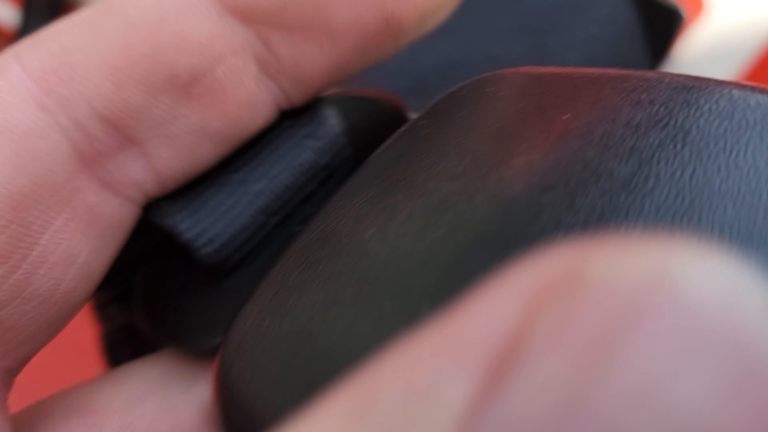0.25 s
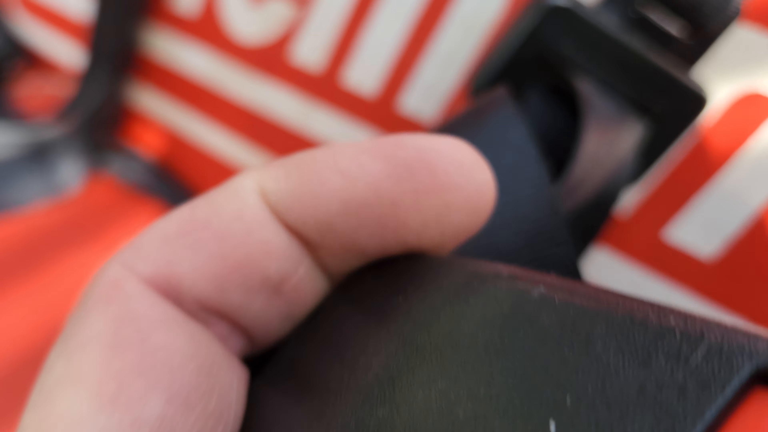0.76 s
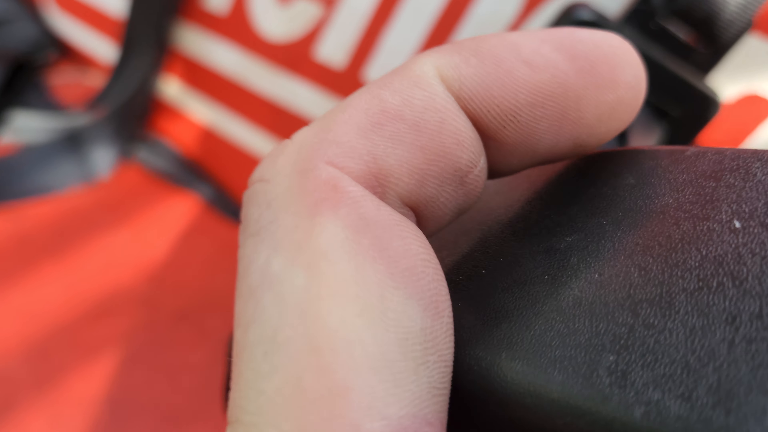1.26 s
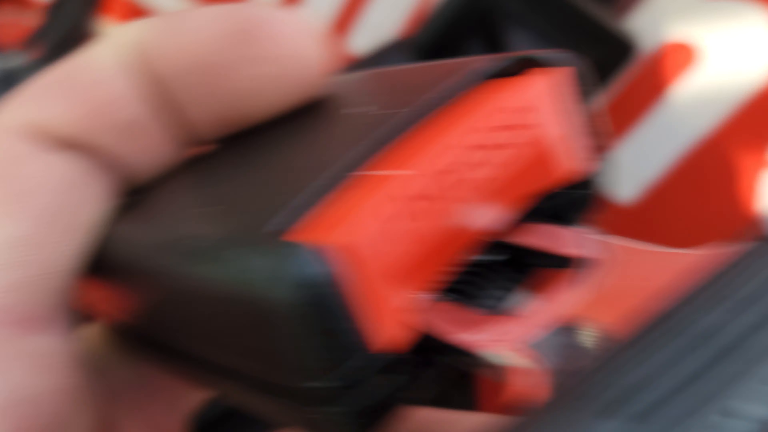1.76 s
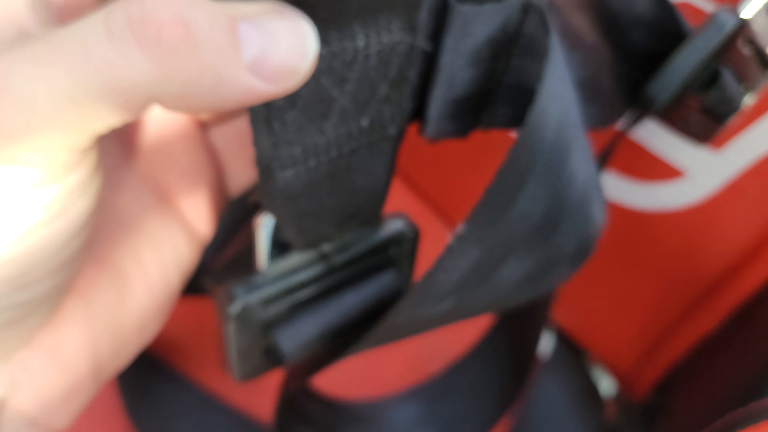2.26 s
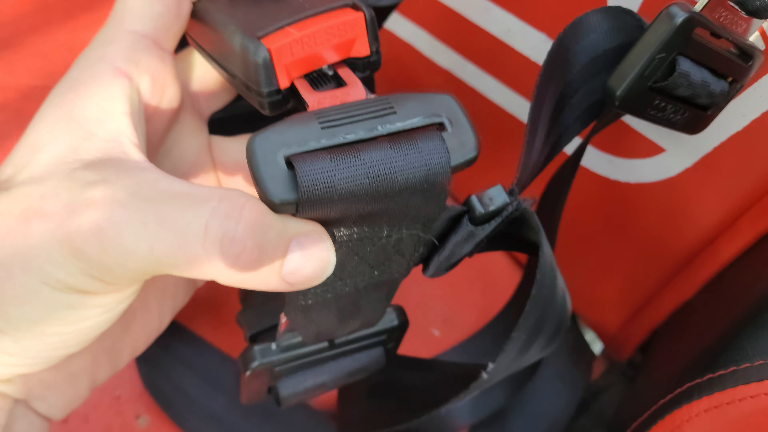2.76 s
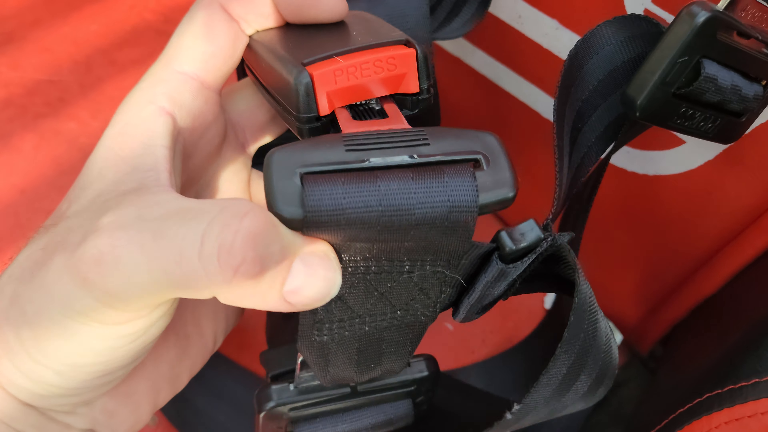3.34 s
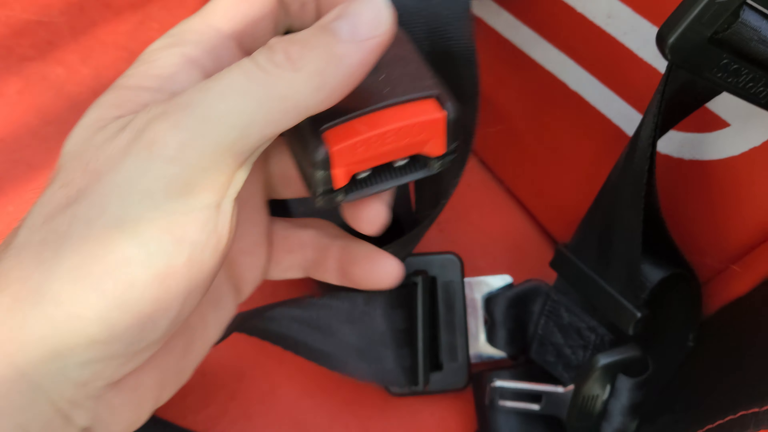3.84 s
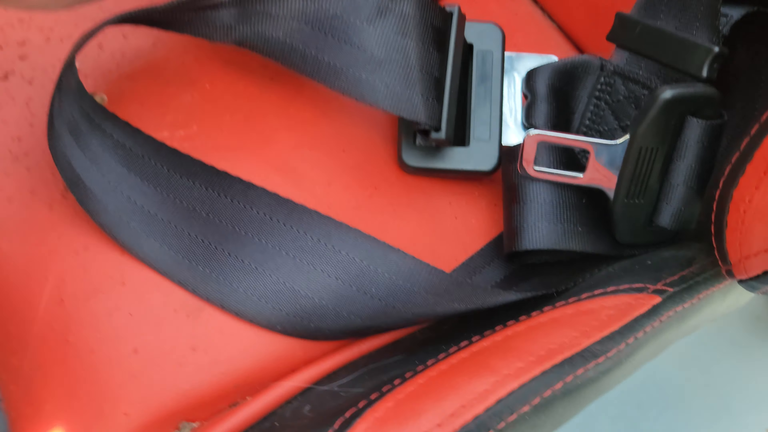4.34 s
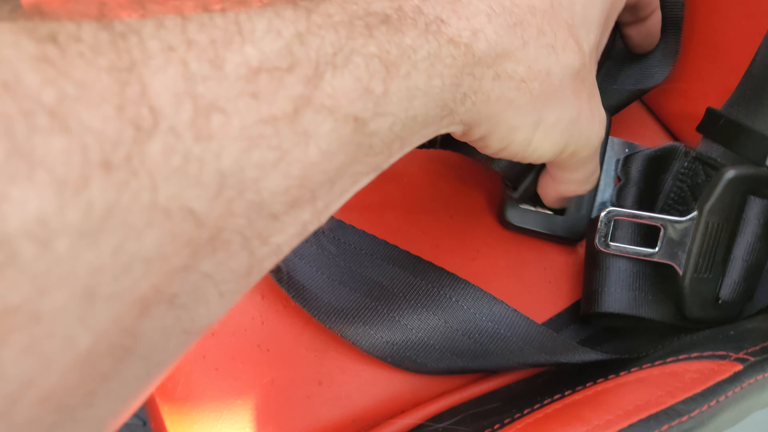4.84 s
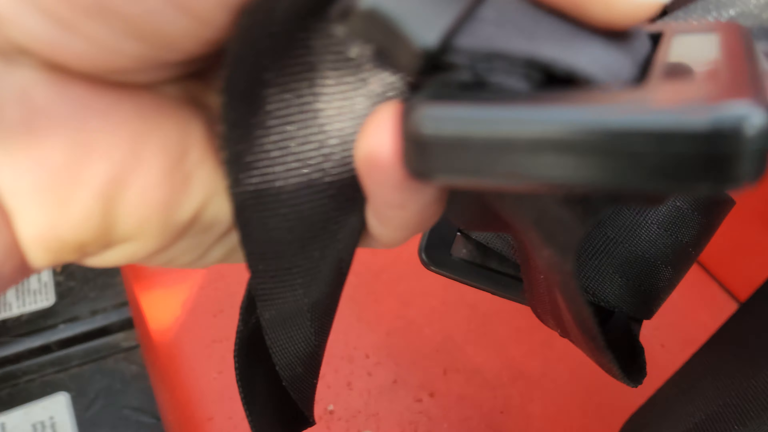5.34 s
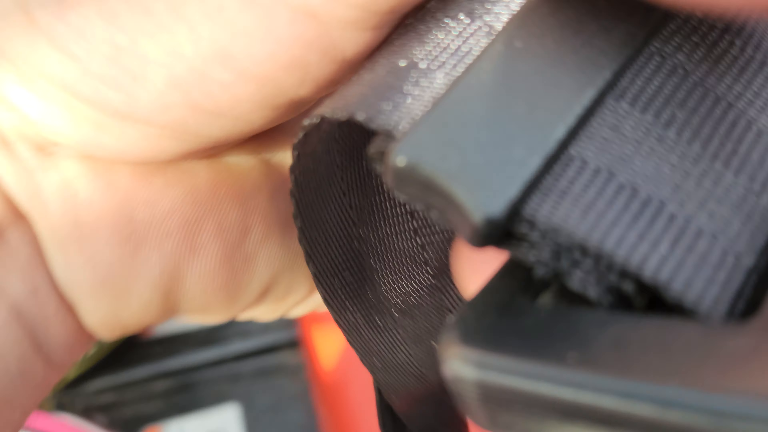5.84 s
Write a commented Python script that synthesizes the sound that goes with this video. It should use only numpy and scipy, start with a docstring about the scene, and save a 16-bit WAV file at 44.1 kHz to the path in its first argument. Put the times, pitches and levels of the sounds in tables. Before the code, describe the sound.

A close, stereo, nearly dry sound of a seatbelt buckle handled outdoors, over a constant soft low rumble and faint hiss. From 0.1 to 0.9 s fingers rub and grip the plastic, with small dull knocks and hollow clacks, clearest near 0.5. A short swish and clack come at 1.03, then a sharper hollow double clack at 1.4. Light knocks at 1.8 and 2.0 lead into a quiet stretch of faint rubbing. Around 2.9 handling resumes, with a barely audible thin whistling squeak at 3.1 to 3.3. At 3.4 to 3.75 the plate comes free in metallic clicks, a soft bump and brisk swishes. Smaller knocks follow at 3.9 and 4.35. At 4.65 to 4.7 comes by far the loudest event, a hard bright plastic-and-steel clack with a short ring and faint echo. Webbing rubs, ticks and small clicks continue, gathering again at 5.8 to 6.0.

```python
"""A low outdoor haze, then almost at once clacks and rubs: a hand turns a seatbelt buckle close by,
frees the latch plate and picks the belt up again. Filtered noise makes the haze.
Damped sines with noise cracks make the hollow plastic clacks; noise chatter through narrow modes, the steel.
Sparse random slips make fingers and webbing rub; damped low sines bump; the surroundings echo faintly."""
import sys
import numpy as np
from scipy import signal
from scipy.fft import rfft, irfft, next_fast_len
from scipy.io import wavfile
from scipy.ndimage import uniform_filter1d

SR = 44100
rng = np.random.default_rng(int(sys.argv[2]) if len(sys.argv) > 2 else 0)


def wav_record(signal):
    """Record a signal, one row per channel, as 16-bit PCM in the file named by sys.argv[1]."""
    frames = np.transpose(np.atleast_2d(signal))
    bounded = np.clip(frames, -1, 1)
    # unit amplitude maps onto the largest positive 16-bit level
    quanta = np.round(bounded * 32767).astype(np.int16)
    wavfile.write(sys.argv[1], SR, quanta)


N = 268436  # samples
EDGE_HZ = 16400  # upper band limit
USUAL_DRAG_DB, USUAL_SMOOTH_DB = -52, -6  # reference drag; reference fizz over swish


def gain_of(db):
    """Amplitude factor of a level in dB."""
    return 10 ** (np.asarray(db) / 20)


def evened(x):
    """Scales to unit rms over all channels."""
    return x / np.sqrt(np.mean(x ** 2) + 1e-20)


def read(points, hz):
    """A table over frequency, joined on a log axis."""
    f, value = np.transpose(points)
    return np.interp(np.log(hz + 1), np.log(f + 1), value)


def add(mix, start_s, sound):
    """Adds a stereo sound in place, cut at the end of the mix."""
    part = mix[:, max(round(start_s * SR), 0):][:, :sound.shape[1]]
    part += sound[:, :part.shape[1]]


def panned(left_right_db):
    """Left and right gains of unit mean power."""
    return evened(gain_of(np.array([[left_right_db], [-left_right_db]]) / 2))


def band(x, edges_hz, order):
    """Butterworth bandpass."""
    edges_hz = np.clip(edges_hz, 10, SR / 2 - 100)
    return signal.sosfilt(signal.butter(order, edges_hz, "band", fs=SR, output="sos"), x)


def levelled(x, db, span_s):
    """Sets the rms level of the first span_s seconds."""
    return x * gain_of(db) / np.sqrt(np.mean(x[:, :int(span_s * SR)] ** 2) + 1e-20)


def decay(t, t60_s):
    """Exponential fall of 60 dB in t60_s."""
    return np.exp(-np.log(1000) * t / t60_s)


def lowpassed(x, order, hz):
    """Lowpass without delay, so that x minus the result is the rest."""
    return signal.sosfiltfilt(signal.butter(order, hz, fs=SR, output="sos"), x)


def drift(points):
    """Slow random curve of unit rms through the given number of points."""
    return evened(signal.resample(rng.standard_normal(points), N))


def resonated(x, hz, width_hz):
    """One narrow resonance with unit peak gain."""
    return signal.lfilter(*signal.iirpeak(hz, hz / width_hz, fs=SR), x)


# likeness of left and right: (frequency [Hz], correlation [-1..1])
LIKENESS = [(60, 1), (130, 0.93), (290, 0.8), (640, 0.37), (1400, 0.006), (2500, 0.071), (15000, -0.037)]


def coloured(x, tone, patchy_db):
    """Gives two noises a spectrum and drifting patches; left and right agree in the bass only."""
    hz, _, z = signal.stft(x, SR, nperseg=2048)
    same = np.clip(read(LIKENESS, hz), -1, 1)[:, None]
    z[1] = same * z[0] + np.sqrt(1 - same ** 2) * z[1]
    patches = uniform_filter1d(rng.standard_normal(z.shape[1:]), size=11, axis=0)
    patches = evened(uniform_filter1d(patches, size=3, axis=1))
    z = z * gain_of(read(tone, hz)[:, None] + patchy_db * patches)
    return evened(signal.istft(z, SR, nperseg=2048)[1][:, :N])


def chatter(t, length_s, attack_s=0.00044):
    """The faces meet within a fraction of a millisecond and rattle out in tiny contacts."""
    u = t / (length_s / 4)
    rise = 1 - np.exp(-t / attack_s)
    fall = np.exp(-u ** 2) + 0.61 * np.exp(-u / 2)
    return rng.standard_normal((2, len(t))) * rise * fall


# outdoor haze spectrum: (frequency [Hz], relative density [dB per Hz])
HAZE_TONE = [(15, -8.5), (30, -10), (50, 1), (72, 4.5), (100, -2.5), (125, -4.5), (190, -9), (270, -19),
             (430, -31), (750, -25), (1400, -36), (2300, -44), (6000, -50.5), (16000, -64.5)]
HAZE_DB = -41.5
RUMBLE_DB, RUMBLE_GROWTH = -42, 0.18  # level at the usual drag; dB per dB of drag


def haze(drag_db, swell_db=1.47):
    """A steady outdoor hiss over a low rumble that swells by chance and grows as the hand pushes things about."""
    air = panned(1.0) * coloured(rng.standard_normal((2, N)), HAZE_TONE, patchy_db=1.0)
    low = lowpassed(air, order=2, hz=200)
    push_db = RUMBLE_GROWTH * (drag_db - USUAL_DRAG_DB)
    rumble = gain_of(RUMBLE_DB + push_db + swell_db * drift(60)) * low
    return rumble + gain_of(HAZE_DB) * (air - low)


# far echo decay: (frequency [Hz], t60 [s])
FAR_DECAY = [(100, .7), (500, 1.0), (1500, 0.4), (4000, 1.5), (8000, 1.1), (16000, 0.77)]


def echo(x, near_db, far_db, near_t60_s=0.16):
    """Quick scatter off the seat, then a faint long tail from the surroundings."""
    t = np.arange(SR) / SR
    taps = rng.standard_normal((2, SR)) * (rng.random((2, SR)) < .1) * (t > .004)
    near = evened(taps * decay(t, near_t60_s))
    hz, at_s, z = signal.stft(taps, SR, nperseg=256)
    z = z * decay(at_s, read(FAR_DECAY, hz)[:, None])
    far = evened(signal.istft(z, SR, nperseg=256)[1][:, :SR])
    response = (gain_of(near_db) * near + gain_of(far_db) * far) / np.sqrt(SR)
    return signal.fftconvolve(x, response, axes=1)[:, :N]


ATTACK_DB_PER_S, RELEASE_DB_PER_S = 479, 334


def stroke(t, start_s, held_s):
    """Level in dB of one movement: it rises, holds at full level from start_s and falls."""
    early_s = np.maximum(start_s - t, 0)
    late_s = np.maximum(t - start_s - held_s, 0)
    return -ATTACK_DB_PER_S * early_s - RELEASE_DB_PER_S * late_s


# strokes of fingers and webbing over buckle and seat; pressing adds drag, smooth webbing adds fizz:
# (time at full speed [s], held [s], swish level [dB], drag over swish [dB], fizz over swish [dB])
STROKES = [(0.11, 0.068, -54, 5.5, -3), (0.26, 0.08, -54.5, 2.5, -9), (0.367, 0.0056, -44.5, -9, 0),
           (0.42, .03, -57.5, 9.5, -18), (0.48, .012, -48.5, 1.5, -3), (0.52, 0.026, -45, -4, -4.5),
           (0.589, 0.048, -48.5, 0, -7.5), (0.65, 0.059, -51, 1, -16), (0.74, 0.057, -63, 8, -26),
           (1.017, 0.0089, -42, -7, -8.5), (1.075, 0.017, -55, -5, -4), (1.125, 0.012, -47.5, -14, -9),
           (1.29, 0.01, -64, 0, 2), (1.402, 0.015, -57, 3, 1), (1.71, 0.023, -46, -30, -13),
           (1.80, 0.09, -63, -12, 1.5), (2.04, 0.2, -60, -0.5, -19), (2.323, 0.049, -49, -9, -12.5),
           (2.49, 0.023, -64, 1.5, -8), (2.87, 0.059, -58, -17, -8), (2.948, 0.063, -49, -9, -1.5),
           (3.03, 0.071, -59, 3, -5), (3.27, 0.018, -70, -12, -5), (3.387, 0.026, -47.5, -5, -3),
           (3.5, 0.038, -44, -7, 0.5), (3.548, 0.0062, -36.5, 2, 0), (3.604, 0.036, -40.5, -10, -0.5),
           (3.685, 0.015, -44, -8.5, -4), (3.74, 0.021, -52.5, -1, -3), (3.958, .04, -48.5, -2, -0.5),
           (4.175, .03, -55.5, -4, -4), (4.335, 0.0072, -54.5, 3.5, -0.5), (4.505, 0.03, -58.5, 0, 0.5),
           (4.654, 0.061, -34, -4, -5.5), (4.74, 0.053, -43.5, -1.5, -4), (4.82, .02, -43, -3.5, -6.5),
           (4.918, 0.077, -49.5, 1.5, 2), (5.10, 0.08, -54, -0.5, 0), (5.2, 0.067, -53.5, -13, -6),
           (5.355, 0.014, -62.5, -10, 3), (5.50, 0.054, -53, -5.5, -8.5), (5.70, 0.22, -52, -7.5, -5),
           (5.867, 0.011, -41.5, -9, -1.5), (5.925, 0.076, -52.5, 5.5, 0.5)]
# light contact between strokes, least while the hand holds the buckle steady: (time [s], swish level [dB])
CONTACT = [(0, -61.5), (0.3, -52.5), (0.7, -63), (0.88, -64), (1.08, -64), (1.36, -64), (1.5, -62),
           (2.1, -60.5), (2.5, -66.5), (2.77, -72.5), (2.92, -61.5), (3.2, -62), (3.72, -54.5),
           (4.1, -61.5), (4.42, -62.5), (4.95, -54.5), (5.42, -58.5), (6.09, -56.5)]
CONTACT_PRESSURE_DB, CONTACT_SMOOTH_DB = -2.5, -7.5  # drag and fizz over swish
# the hand takes a new grip and the plastic creaks: (time [s], held [s], level [dB])
REGRIPS = [(0.16, 0.017, -53), (0.395, 0.046, -45.5), (1.89, .03, -52.5), (2.955, .035, -50),
           (3.975, 0.016, -47), (4.19, 0.0079, -47.5), (4.33, 0.25, -52), (4.691, 0.085, -44.5),
           (5.925, 0.017, -41.5), (5.98, 0.029, -43.5)]
GRIP_DB, GRIP_GROWTH = -59, 0.47  # creak at the usual drag; dB per dB of drag


def handling():
    """Levels in dB of grip, drag, swish and fizz: powers of strokes, light contact and new grips add."""
    t = np.arange(0, N, 64) / SR
    offsets_db = np.array([[CONTACT_PRESSURE_DB], [0], [CONTACT_SMOOTH_DB]])
    power = gain_of(np.interp(t, *np.transpose(CONTACT)) + offsets_db) ** 2
    for start_s, held_s, db, pressure_db, smooth_db in STROKES:
        offsets_db = np.array([[pressure_db], [0], [smooth_db]])
        power = power + gain_of(db + stroke(t, start_s, held_s) + offsets_db) ** 2
    drag_db = 10 * np.log10(power[0])
    grip = gain_of(GRIP_DB + GRIP_GROWTH * (drag_db - USUAL_DRAG_DB)) ** 2
    for start_s, held_s, db in REGRIPS:
        grip = grip + gain_of(db + stroke(t, start_s, held_s)) ** 2
    return [np.interp(np.arange(N) / SR, t, 10 * np.log10(p)) for p in (grip, *power)]


def friction(level_db, tone, slips_per_s, grain_db, patchy_db):
    """Thousands of tiny slips a second, of uneven size, following the stroke."""
    size = gain_of(grain_db * np.minimum(rng.exponential(1, N), 4))
    slips = size * (rng.random(N) < slips_per_s / SR)
    return coloured(rng.standard_normal((2, N)) * slips, tone, patchy_db) * gain_of(level_db)


# rubbing spectra, each: (frequency [Hz], relative density [dB per Hz])
GRIP_TONE = [(110, 5), (220, 3), (300, 4.5), (450, -7), (680, 2.5), (900, -22), (1400, -25.5), (3000, -60)]
DRAG_TONE = [(400, -32), (900, -4.5), (1250, 1), (1600, -4), (2000, -9), (2800, -13), (6000, -38)]
SWISH_TONE = [(1000, -4.5), (2200, -2.5), (3300, 2.5), (4500, -1.5), (6000, -3), (8300, -4), (10500, -21.5),
              (16000, -63)]
FIZZ_TONE = [(5000, -34.5), (9000, 5), (12000, -1.5), (16000, -2.5)]
SHEEN_HZ, SHEEN_SHARE = 5200, 0.68  # swish above this follows smoothness, dB per dB


def rubbing(grip_db, drag_db, swish_db, fizz_db):
    """The grip creaks, skin drags on the housing, webbing and plate swish and fizz; the stroke falters."""
    grip = friction(grip_db, GRIP_TONE, slips_per_s=1400, grain_db=3.0, patchy_db=2.5)
    drag = gain_of(1.0) * friction(drag_db, DRAG_TONE, slips_per_s=4300, grain_db=4.0, patchy_db=4.5)
    swish = friction(swish_db, SWISH_TONE, slips_per_s=6000, grain_db=0.0, patchy_db=3.0)
    swish = gain_of(-1.0) * panned(-1.1) * swish
    dull = lowpassed(swish, order=3, hz=SHEEN_HZ)
    sheen = (swish - dull) * gain_of(SHEEN_SHARE * (fizz_db - swish_db - USUAL_SMOOTH_DB))
    fizz = friction(fizz_db, FIZZ_TONE, slips_per_s=5600, grain_db=1.0, patchy_db=4.0)
    fizz = gain_of(-1.0) * panned(-11.5) * fizz
    falter_db = 1.14 * drift(700)
    return (grip + drag + dull + sheen + fizz) * gain_of(falter_db)


# faint whistling tone: (time [s], held [s], mean level [dB])
WHISTLE = (3.11, .21, -60)
# its two narrow pitches: (frequency [Hz], width [Hz], relative level [dB])
WHISTLE_PITCHES = [(1642, 32, -1), (3720, 130, -2)]


def whistle(flutter_db=1.5):
    """A faint, unsteady whistling tone at two narrow pitches: noise through narrow resonances."""
    start_s, held_s, db = WHISTLE
    noise = rng.standard_normal((2, N))
    tone = sum(gain_of(pitch_db) * evened(resonated(noise, hz, width_hz))
               for hz, width_hz, pitch_db in WHISTLE_PITCHES)
    level_db = db + stroke(np.arange(N) / SR, start_s, held_s) + flutter_db * drift(400)
    return evened(tone) * gain_of(level_db)


def ticks(swish_db, per_s=36, spread_db=2.5, tick_db=-0.5, length_s=0.0079):
    """Now and then a sliding edge catches and ticks; the faster the stroke, the louder."""
    out, t = np.zeros((2, N)), np.arange(SR // 40) / SR
    for when, size, colour, side in rng.random((int(per_s * N / SR), 4)):
        excess_db = spread_db * min(-np.log(1 - size), 3)
        db = swish_db[int(when * N)] + tick_db + excess_db
        centre_hz = 1500 * 5 ** colour
        tick = band(chatter(t, length_s), (centre_hz / 2, centre_hz * 2), order=2)
        add(out, when * N / SR, levelled(tick, db, span_s=0.0019) * panned(12 * (side - .5)))
    return out


# soft bumps of hand and buckle against the seat: (time [s], amplitude before thump_db [dB])
THUMPS = [(0.173, -33.5), (0.486, -26), (0.708, -37), (1.039, -34.5), (3.546, -25.5), (3.925, -35),
          (4.348, -29), (4.707, -24.5), (5.867, -27.5)]


def thumps(hz=88, t60_s=0.04, thump_db=5.5):
    """A few heavily damped swings of the cushioned mass."""
    out, t = np.zeros((2, N)), np.arange(SR // 6) / SR
    swing = np.sin(2 * np.pi * hz * t) * decay(t, t60_s)
    for start_s, db in THUMPS:
        add(out, start_s, panned(1.0) * gain_of(db + thump_db) * swing)
    return out


# loose steel parts touching: (time [s], frequency [Hz], level [dB], left-right [dB])
TINGS = [(1.4234, 4510, -37, -8), (3.3997, 3270, -47, -0.2), (3.416, 3200, -44, -1),
         (3.5465, 14100, -39, -15), (3.6254, 5300, -35, -10), (3.6753, 1750, -40.5, -1),
         (3.6757, 3490, -47, -7), (3.8315, 1610, -41.5, 1), (4.345, 7640, -41, -17), (4.7033, 4420, -24, 1),
         (4.745, 1870, -41.5, 11), (4.9954, 3620, -35.5, -14), (5.8978, 1574, -40.5, 4),
         (5.908, 3080, -44, 3)]


def tings(t60_s=0.028, touch_s=0.004):
    """A brief scuffing touch sets one mode of a small steel part ringing; the hand damps it."""
    out, t = np.zeros((2, N)), np.arange(SR // 12) / SR
    for start_s, hz, db, pan_db in TINGS:
        mode = np.sin(2 * np.pi * hz * t) * decay(t, t60_s)
        ring = signal.fftconvolve(chatter(t, touch_s), mode[None], axes=1)
        add(out, start_s, levelled(ring * panned(pan_db), db, span_s=0.016))
    return out


# latch plate modes: (frequency [Hz], width [Hz], mean level over the bare click [dB])
STEEL_MODES = [(3270, 34, 0.5), (4560, 140, -15), (4760, 32, -16.5), (7665, 160, -4.5), (8500, 330, 3),
               (13400, 180, -25)]


def steel(x):
    """The plate adds its narrow modes, more or less of each by where it is struck."""
    out = x.copy()
    for hz, width_hz, db in STEEL_MODES:
        strike_db = db + rng.standard_normal()
        out += gain_of(strike_db) * resonated(x, hz, width_hz)
    return out


# hard clicks of plate, catch and fittings; the harder the contact, the higher the reach:
# (time [s], click level before snap_db [dB], reach [Hz], knock level [dB], knock frequency [Hz],
#  click left-right [dB], chatter length [s])
SNAPS = [(0.0777, -44.5, 9000, -41, 460, 0, 0.0077), (0.17, -35, 5630, -32.5, 368, -12, 0.005),
         (0.2377, -32.5, 1230, -31, 620, 5, 0.004), (0.356, -34, 1490, -33.5, 540, -1, .016),
         (0.478, -36.5, 9000, -41.5, 457, 12, 0.012), (0.6857, -33.5, 1160, -35.5, 288, -19, 0.028),
         (0.693, -47, 1200, -46, 296, -10, 0.011), (0.716, -54, 1200, -39.5, 360, -8.5, 0.038),
         (0.8326, -41.5, 1520, -48, 340, -13, 0.021), (1.228, -43, 2240, -64, 390, 1, 0.03),
         (1.4217, -25.5, 3720, -52, 410, -7, 0.0093), (1.791, -33, 1540, -41, 583, -2, 0.0085),
         (2.012, -39, 17300, -55, 720, -4, 0.011), (2.807, -54, 9000, -68, 500, -4, 0.0066),
         (2.866, -49, 8500, -64, 340, -4, 0.014), (3.08, -45.5, 9500, -56, 610, -5.5, 0.016),
         (3.542, -24.5, 5900, -32, 610, 2, .036), (3.547, -27.5, 4500, -51, 594, -11, 0.015),
         (3.556, -36, 10000, -44, 810, -2, .032), (3.6251, -33.5, 3180, -41, 296, -2, .016),
         (3.676, -34.5, 3700, -52, 540, -4, 0.008), (3.736, -44, 8000, -63, 360, -2.5, 0.0065),
         (3.8316, -44, 4000, -44.5, 584, -1, .01), (3.9213, -33, 4900, -34, 364, -10.5, 0.0085),
         (4.3448, -29, 3900, -32.5, 302, -21, 0.0083), (4.427, -48.5, 3800, -38.5, 395, 1, 0.01),
         (4.7024, -8.5, 9960, -28, 746, -3, 0.0096), (4.7372, -32.5, 4700, -42, 740, 0.5, 0.038),
         (4.788, -49, 5000, -35.5, 292, 0, 0.01), (4.978, -55, 4000, -46, 684, -3, .012),
         (4.9952, -38, 5000, -45, 730, 2, 0.044), (5.045, -36, 13100, -59.5, 684, -2.5, 0.021),
         (5.195, -41.5, 1200, -39, 340, -8, .01), (5.393, -36.5, 1200, -35.5, 330, -3.5, 0.011),
         (5.6737, -39, 1900, -39, 716, -3, 0.0053), (5.834, -35.5, 11000, -36.5, 510, -9, 0.0091),
         (5.926, -51, 1800, -38, 740, -9, .024), (5.99, -34, 2700, -40.5, 670, 1, 0.029),
         (5.9995, -40, 3500, -38, 725, -5, 0.026)]
# noise part of the knock: (low edge [Hz], high edge [Hz])
KNOCK_BAND_HZ = (138, 740)


def snaps(knock_t60_s=0.02, snap_db=-3.5, damping=1.24, low_hz=1100, thinning=0.03):
    """A bright chatter of steel over a short, dull knock of the held part; hard contacts are thinner and brighter."""
    out, t = np.zeros((2, N)), np.arange(4096) / SR
    hz = np.fft.rfftfreq(len(t), 1 / SR)
    for start_s, click_db, reach_hz, knock_db, knock_hz, pan_db, length_s in SNAPS:
        burst = chatter(t, length_s)
        knock = np.sin(2 * np.pi * knock_hz * t) * decay(t, knock_t60_s)
        dull = evened(knock) + 1.26 * evened(band(burst, KNOCK_BAND_HZ, order=2))
        # second-order lowpass at the reach
        softening = 1 + 1j * damping * hz / reach_hz - (hz / reach_hz) ** 2
        softened = irfft(rfft(steel(burst)) / softening)
        thinned = band(softened, (low_hz + thinning * reach_hz, EDGE_HZ), order=2)
        click = levelled(thinned, click_db + snap_db, span_s=0.0061) * panned(pan_db)
        add(out, start_s, click + levelled(dull, knock_db, span_s=0.0045))
    return out


# blows on the buckle housing: (time [s], ring level before ring_db [dB],
#  contact crack level before crack_db [dB], factor on ring and crack times [1])
CLACKS = [(0.0778, -34.5, -41.7, 1), (0.2754, -43.3, -58.0, 1), (0.4325, -41.3, -44.9, 1),
          (0.478, -29.0, -38.1, 1), (0.5288, -41.8, -39.6, 1), (0.8012, -40.4, -55.0, 1),
          (0.9089, -43.8, -58.1, 1), (1.0276, -25.8, -44.6, 0.9), (1.0336, -30, -45.6, 0.6),
          (1.0651, -37.3, -51.7, 0.6), (1.4092, -26.3, -48.2, 0.7), (1.4225, -17.6, -27.0, 0.6),
          (1.96, -51.2, -64.7, 1), (2.9533, -42.1, -50.7, 1), (3.3659, -45.1, -48.6, 1),
          (3.3995, -45.3, -42, 1), (3.406, -34, -43.1, 1), (3.416, -39.7, -40.1, 1),
          (3.447, -44.9, -56.1, 1), (4.1615, -48, -55, 1.4), (4.178, -49, -56, 1.4), (4.65, -8.6, -20.5, 1),
          (4.65368, -9.6, -20.5, 1.2), (4.683, -28, -43, 2), (4.7048, -20.4, -19, 0.7),
          (4.843, -41.5, -41.1, 1), (5.8547, -46, -53, 1), (5.876, -40.8, -44.5, 1.3),
          (5.8991, -42, -54, 1), (5.945, -45, -54, 1)]
# housing modes: (frequency [Hz], relative level before brightening [dB], t60 before that factor [s],
#  left-right [dB], phase between left and right [rad])
HOUSING_MODES = [(1175, -2.5, 0.025, -11, 2), (1296, 4, 0.019, 4.5, 0.9), (1524, -12.5, 0.054, -40, 1.7),
                 (1605, -4, 0.036, 7.5, 2.4), (1830, -21.5, .02, -7, -16.5), (2310, -9.5, 0.023, 9, 2.05),
                 (2850, -21, 0.0097, -0.5, -22.5), (3160, -19, 0.02, 7, 5.3)]


def clacks(crack_s=0.014, ring_db=-1.6, crack_db=-4.5, hollow_hz=1220, brighten=.1):
    """Each blow cracks at the contact and swells into the hollow ring of the housing; hard blows ring brighter."""
    out, t = np.zeros((2, N)), np.arange(SR // 12) / SR
    sides = np.array([[.5], [-.5]])
    swell = 1 - np.exp(-(t / .0006) ** 2)
    for start_s, db, contact_db, hold in CLACKS:
        tilt_db_per_octave = brighten * (db + 11.0)
        ring = 0
        for k, (hz, mode_db, t60_s, pan_db, lag_rad) in enumerate(HOUSING_MODES):
            # neighbouring modes push in opposite directions, which keeps the knock narrow
            tilted_db = mode_db + tilt_db_per_octave * np.log2(hz / hollow_hz)
            size = (-1) ** k * gain_of(tilted_db) * panned(pan_db)
            ring = ring + size * decay(t, t60_s * hold) * np.sin(2 * np.pi * hz * t + sides * lag_rad)
        ring = band(ring * swell, (hollow_hz, 6000), order=4)  # a small shell radiates little bass
        crack = steel(band(chatter(t, crack_s * hold), (1700, 7000), order=1))
        ring = levelled(ring, db + ring_db, span_s=0.0029)
        add(out, start_s, ring + levelled(crack, contact_db + crack_db, span_s=0.01))
    return out


def scene():
    """Everything happens within reach of the microphone, so the echo stays faint."""
    hits = clacks() + snaps() + tings()
    grip_db, drag_db, swish_db, fizz_db = handling()
    rubs = rubbing(grip_db, drag_db, swish_db, fizz_db) + whistle() + ticks(swish_db)
    return hits + thumps() + echo(hits, near_db=-23, far_db=-33) + rubs + haze(drag_db)


# overall tone: (frequency [Hz], gain [dB])
OVERALL_TONE = [(20, 1.5), (6500, -1), (7800, 4), (8500, -3), (9100, -12.5), (9900, -12), (11200, 0),
                (12500, 3.5), (15700, 7), (16300, -17.5)]


def record(dry):
    """Overall tone: a dip near 9-10 kHz and a lift above 12 kHz; peaks stop at full scale; then the band limit."""
    size = next_fast_len(N + 4096)
    response = gain_of(read(OVERALL_TONE, np.fft.rfftfreq(size, 1 / SR)))
    heard = irfft(rfft(dry, size) * response, size)[:, :N]
    edge = signal.firwin(255, EDGE_HZ, window=("kaiser", 8), fs=SR)
    return signal.oaconvolve(np.clip(heard, -1, 1), edge[None], "same", axes=1)


dry = scene()
out = record(dry)
wav_record(out)
```